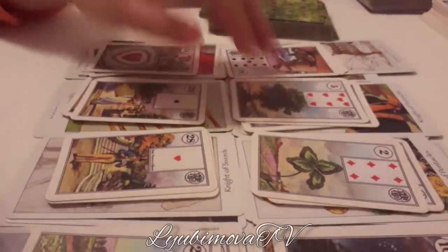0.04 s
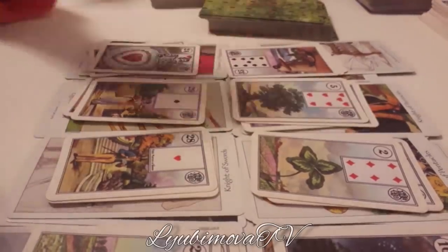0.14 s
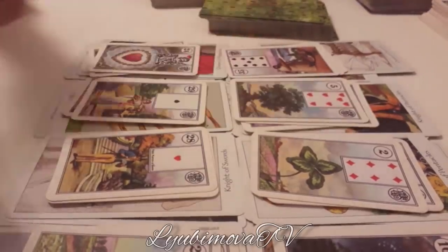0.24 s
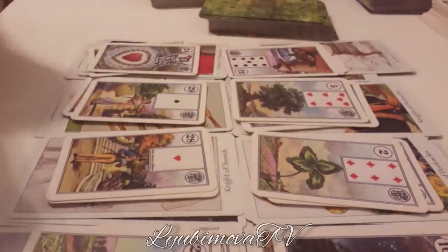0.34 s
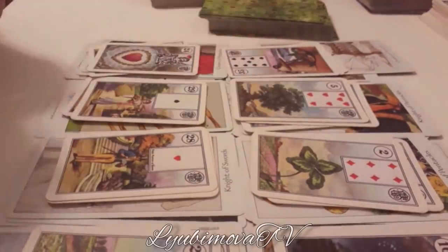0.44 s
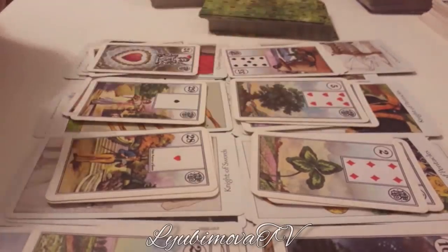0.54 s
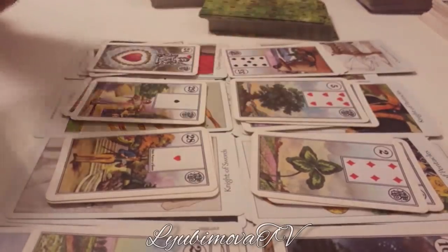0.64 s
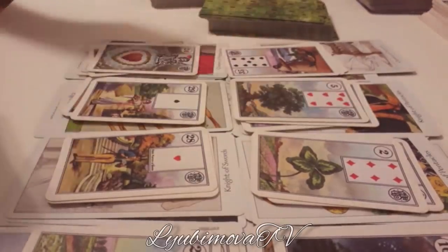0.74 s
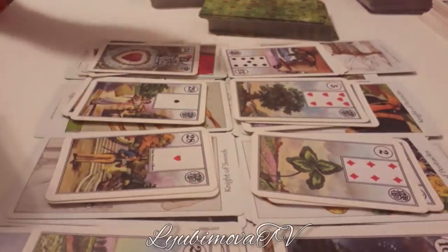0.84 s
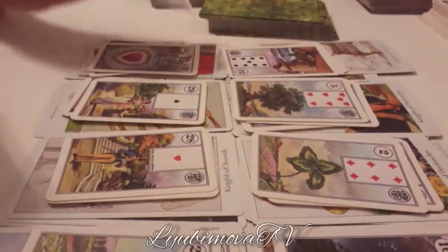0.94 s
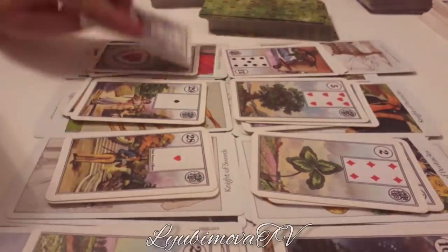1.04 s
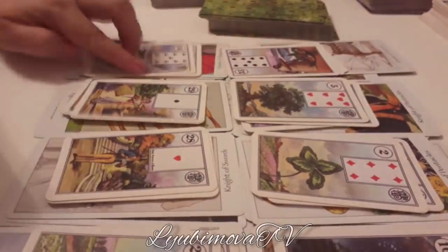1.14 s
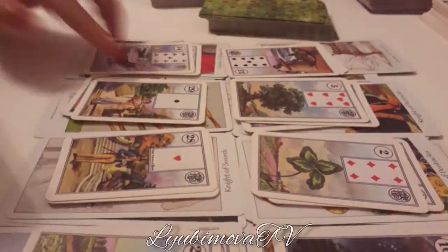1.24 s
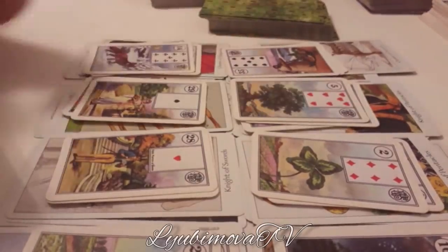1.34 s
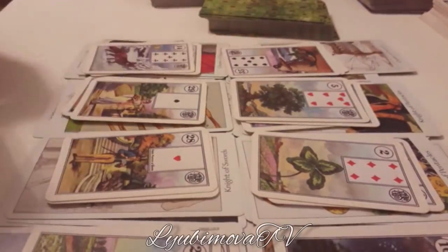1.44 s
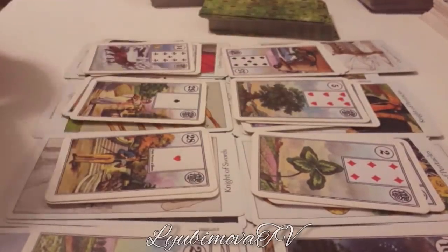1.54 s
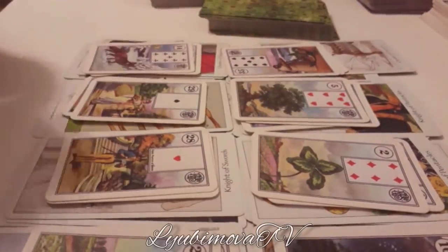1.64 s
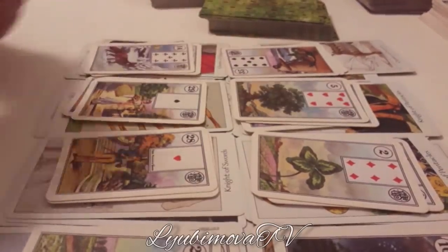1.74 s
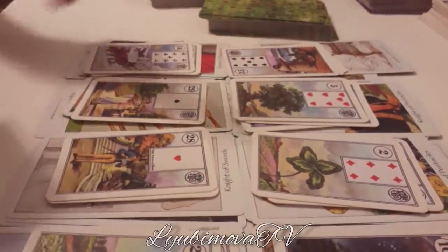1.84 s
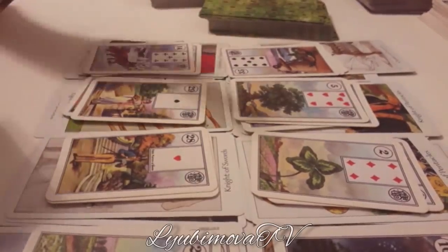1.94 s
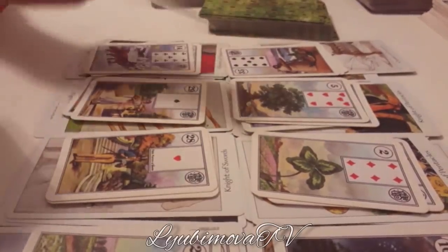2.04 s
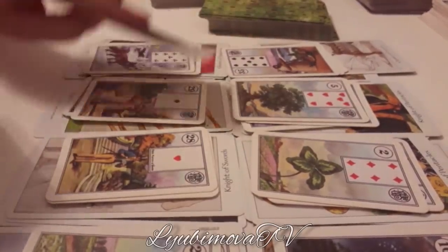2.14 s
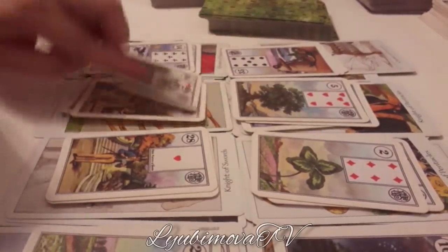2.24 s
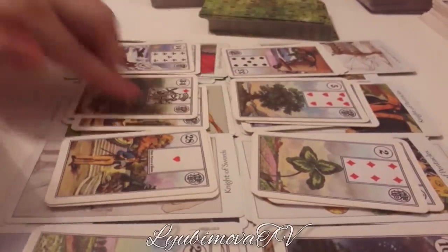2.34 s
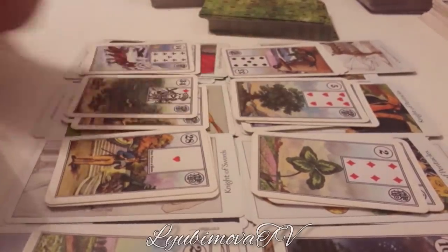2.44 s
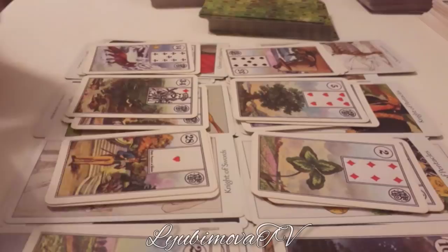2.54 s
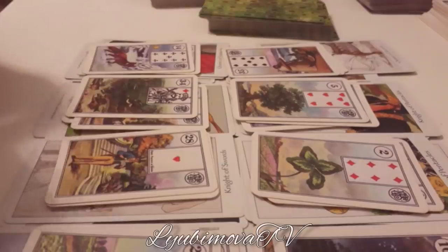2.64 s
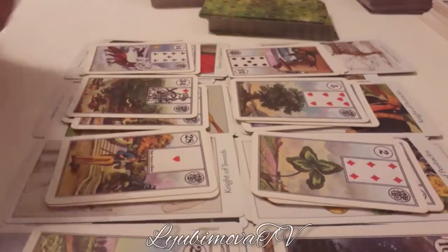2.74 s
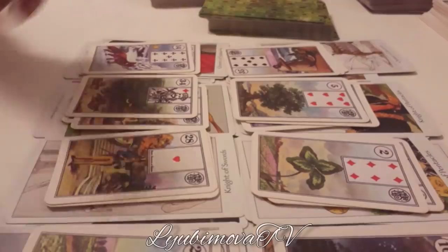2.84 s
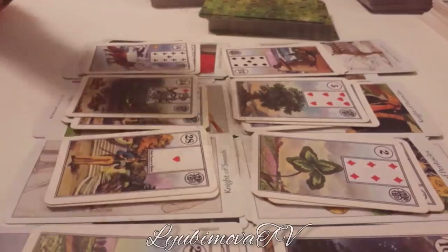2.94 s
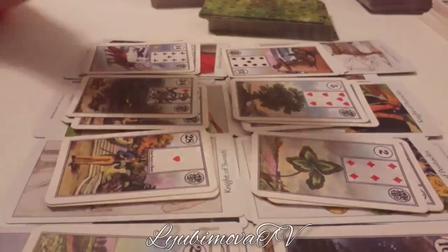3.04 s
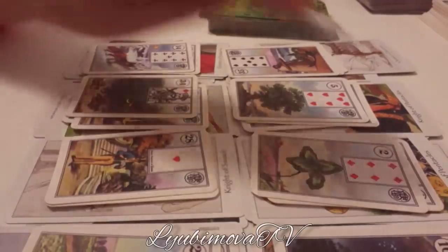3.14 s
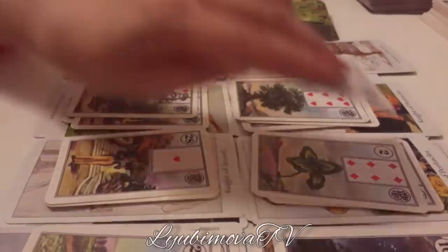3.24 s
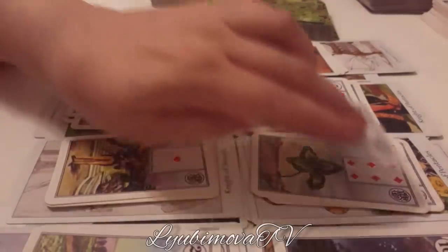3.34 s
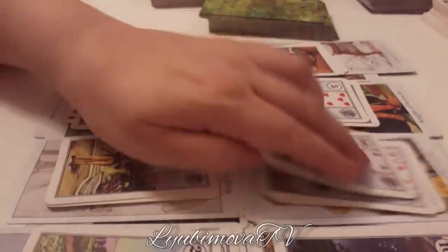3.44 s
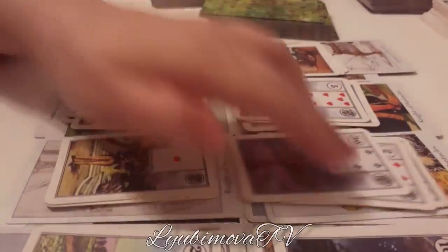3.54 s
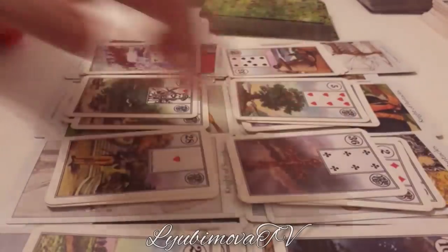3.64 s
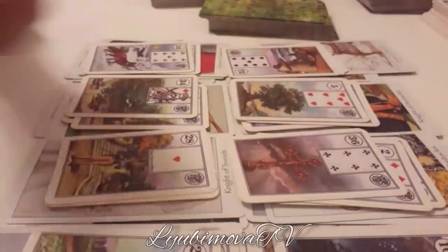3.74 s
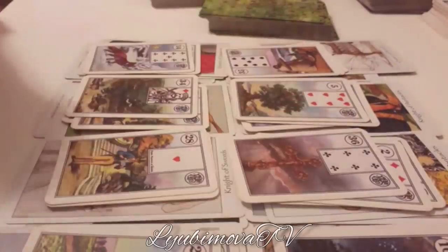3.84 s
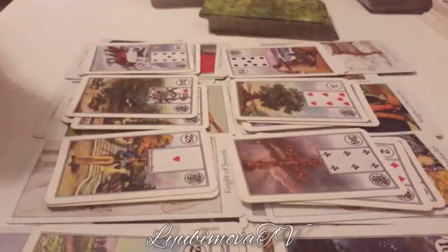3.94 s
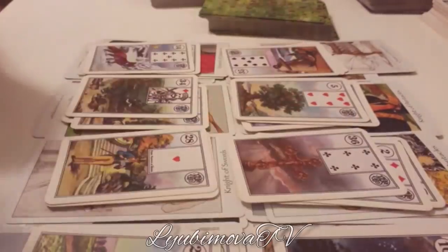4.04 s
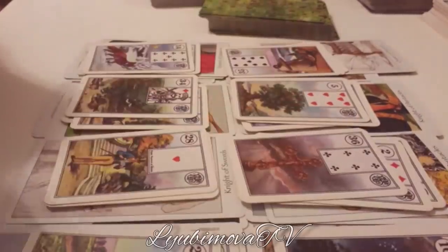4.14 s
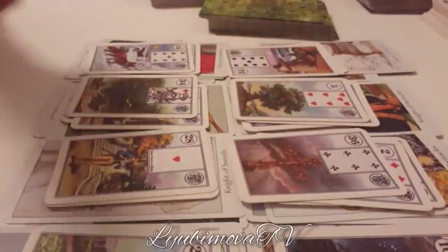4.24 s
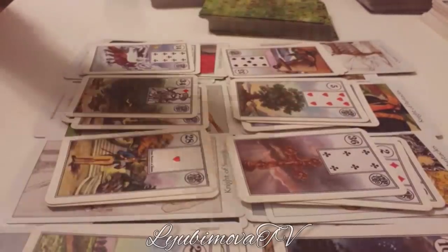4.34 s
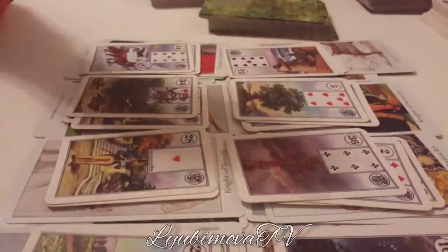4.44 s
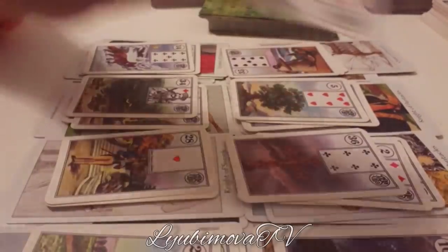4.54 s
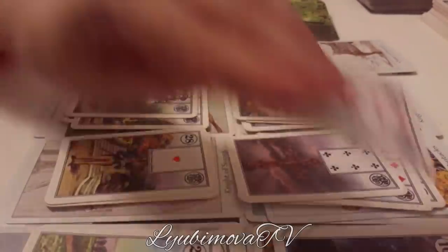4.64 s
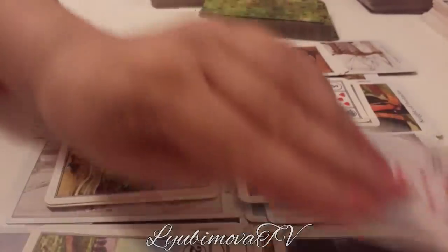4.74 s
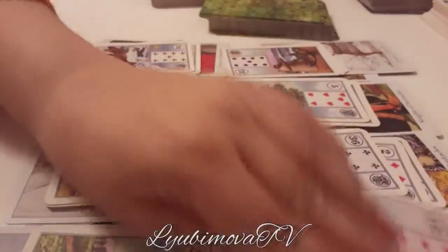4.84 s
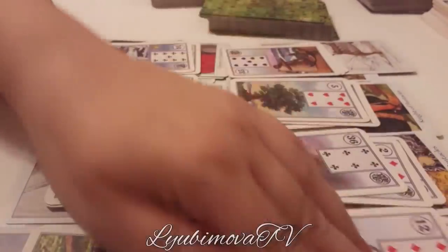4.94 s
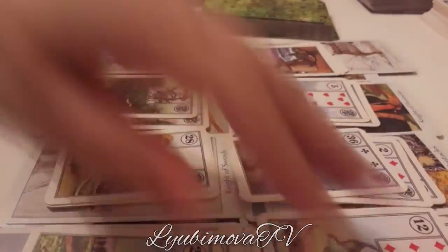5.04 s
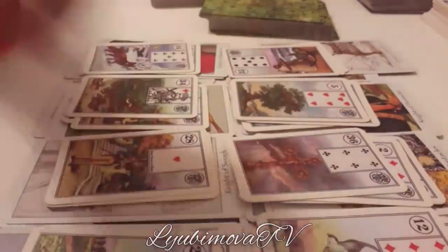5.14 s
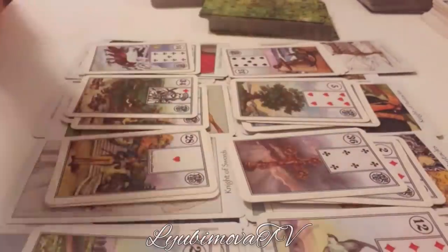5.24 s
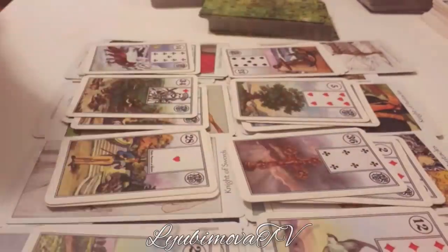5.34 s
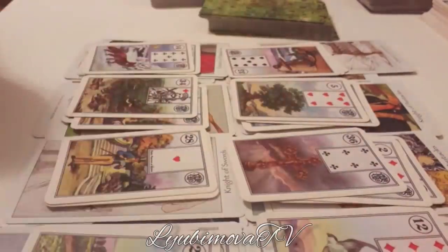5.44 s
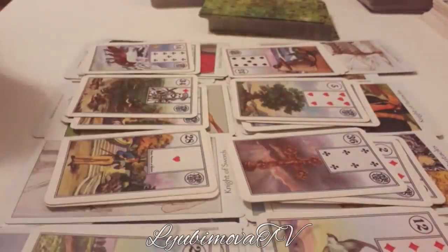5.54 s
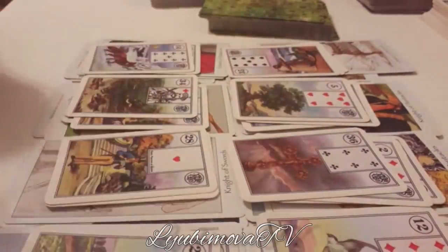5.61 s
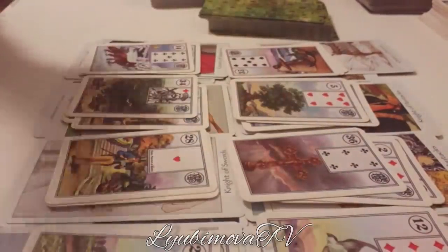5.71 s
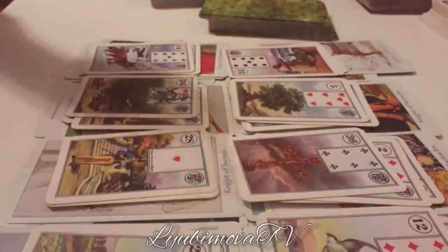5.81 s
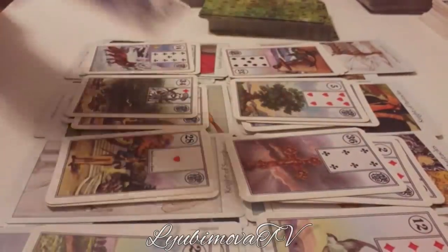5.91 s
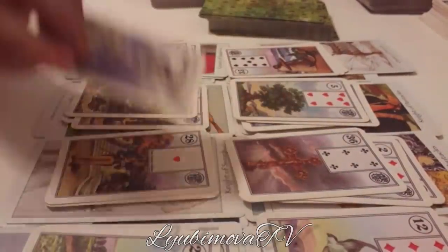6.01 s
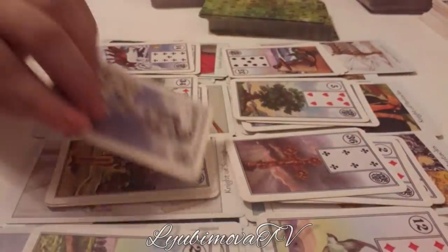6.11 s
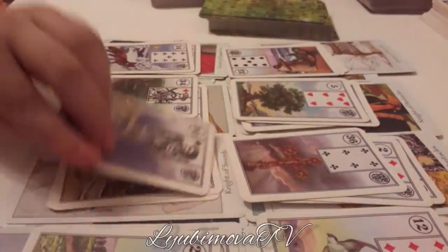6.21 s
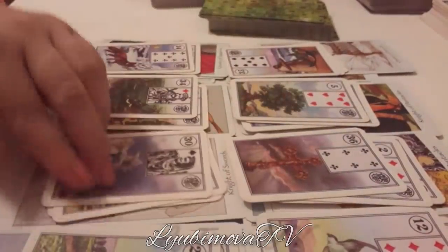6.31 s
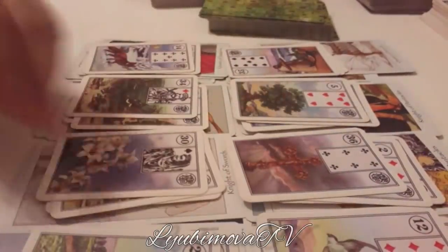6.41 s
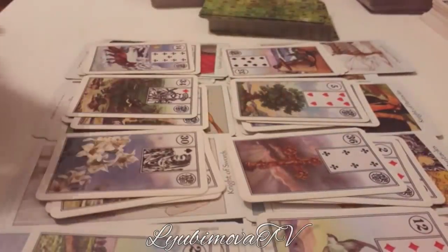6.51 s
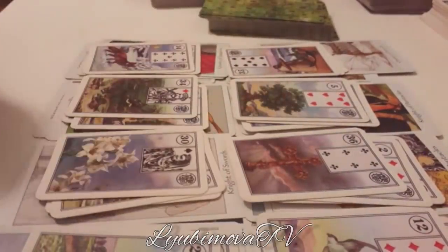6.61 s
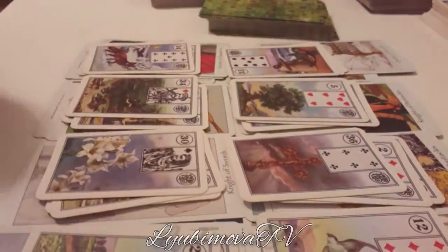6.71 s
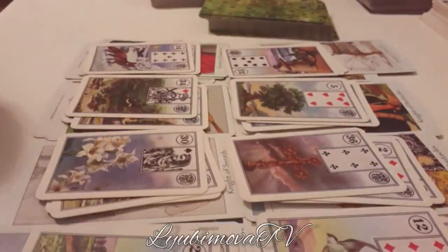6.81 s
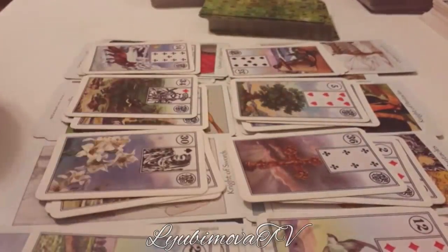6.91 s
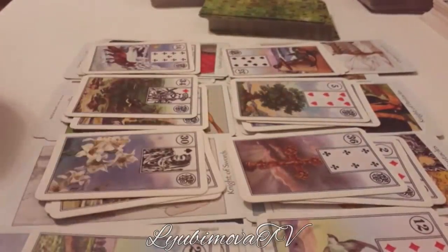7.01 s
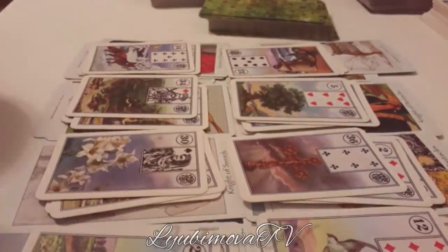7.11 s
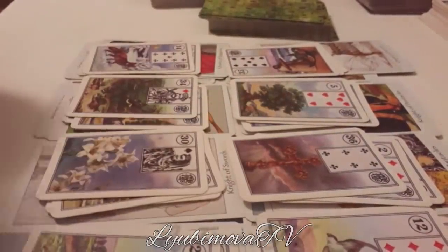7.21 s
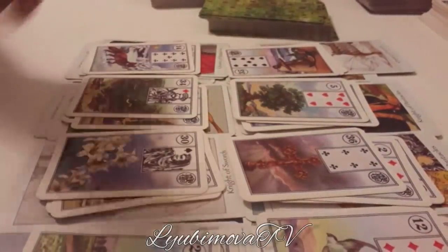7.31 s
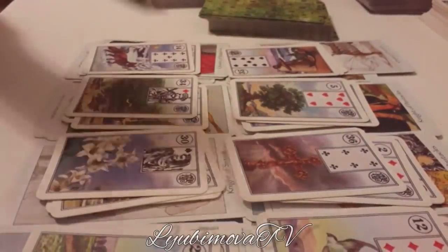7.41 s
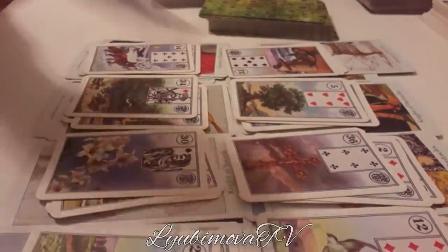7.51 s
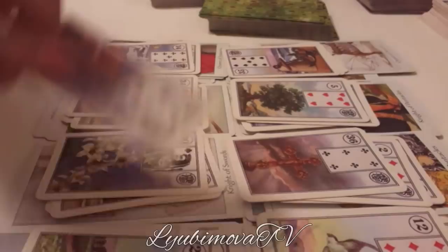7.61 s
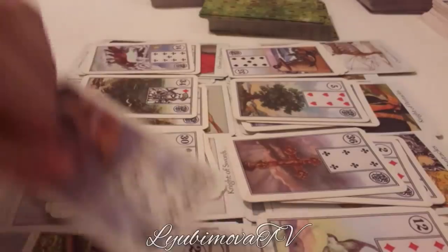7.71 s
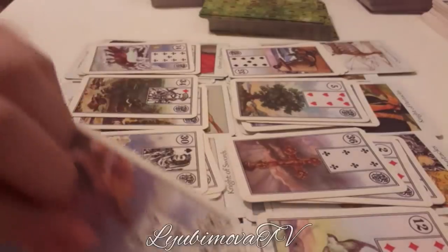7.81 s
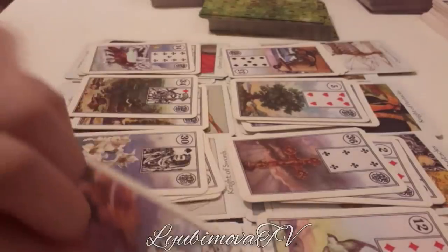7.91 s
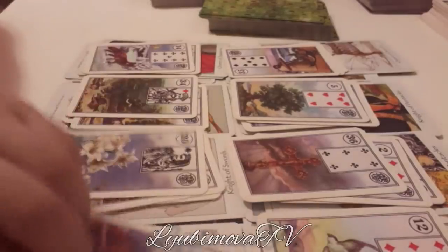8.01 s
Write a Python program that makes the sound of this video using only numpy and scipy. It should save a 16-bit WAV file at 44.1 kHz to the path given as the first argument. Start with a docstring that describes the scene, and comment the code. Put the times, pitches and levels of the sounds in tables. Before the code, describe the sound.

Unhurried card dealing: a crisp flick from the deck, a short pause, then a softer slap on a pile, repeated six times over faint hiss.

```python
"""Playing cards snap off a deck and slap down one by one on a cloth-covered table in a small, dry room.
Each release and touch is a burst of tiny slips driving stack modes, bent sheet and edge; slides are filtered noise.
Ticks, rubs and light drags fill the gaps, with a few soft table bumps.
Near surfaces and a brief room tail answer in nearly mono sound, over faint hiss and wavering mains hum."""
import sys
import numpy as np
from scipy import signal
from scipy.fft import rfft, irfft
from scipy.io import wavfile
from scipy.ndimage import map_coordinates

SR = 44100
rng = np.random.default_rng(int(sys.argv[2]) if len(sys.argv) > 2 else 0)


def transcribe(u):
    """Save the signal u as a 16-bit wav file named by the first command-line argument.

    u: samples, shape (n,) or (channels, n), limited to [-1, 1]; the rate is SR.
    q: integer samples, one column per channel.
    """
    v = np.clip(np.atleast_2d(u).T, -1, 1)
    q = np.round(v * 32767).astype(np.int16)
    wavfile.write(sys.argv[1], SR, q)


N = 355446
TIME = np.arange(N) / SR
STROKE_TIME = TIME[::20]  # coarse clock for slow hand movements, s
LEAD_S = .02  # slips begin this long before a release

# Cards pulled, slipping off the thumb and falling back on the deck; levels are relative.
# Each row: release in seconds, pull length in seconds, pull level in dB, contact in seconds, snap level in dB,
# snap brightness in dB, bend pitch in Hz, fall in seconds, landing level in dB, landing brightness in dB,
# thump level in dB, main deck pitch in Hz.
SNAPS = [(0.6785, 0.068, -49.5, 0.0044, -19, -6.5, 1213, 0.0063, -17, -11, -28, 192),
         (1.8115, 0.094, -44, 0.0045, -26, -3.5, 1130, .005, -27, -22, -31, 194),
         (2.8293, 0.072, -42, 0.0011, -32, 9, 1200, 0.003, -24.5, -3, -32.5, 177),
         (4.24, 0.098, -40.5, 0.00088, -17.5, -2.5, 965, .0025, -30, -15.5, -24.5, 194.6),
         (5.738, 0.1, -42.5, 0.01, -26, 5.5, 1280, .0104, -30.5, 1.5, -27.5, 210),
         (7.2436, 0.059, -38, 0.0029, -21.5, 7.5, 1160, 0.0049, -24.5, -13, -30, 233)]
# Cards laid on a pile, edge first and then flat; levels are relative.
# Each row: edge time in seconds, edge level in dB, edge brightness in dB, fall in seconds, flat level in dB,
# flat brightness in dB, thump against flex in dB, fizz against flex in dB, approach level in dB.
SLAPS = [(1.1764, -40, 12, 0.0056, -32, 2, -1, -3, -48.5),
         (2.321, -37, 10, .0074, -30.5, 1.5, -5, -7, -48.5),
         (3.488, -39, 4.5, 0.0083, -38, 1.5, -5, -5, -49),
         (4.9011, -45.5, 7.5, 0.0033, -35, -1.5, -7, 1.5, -52),
         (6.312, -45, 14, .0041, -29.5, -3.5, -7, -4.5, -46),
         (8.021, -38, 6, 0.0057, -39.5, 6, -5, -4, -53.5)]


def from_db(db):
    """Decibels to gain."""
    return 10 ** (np.asarray(db) / 20)


def rms_one(x):
    """Scale to rms 1."""
    return x / np.sqrt(np.mean(x ** 2) + 1e-20)


def blow(x):
    """Scale a short sound to the energy of 10 ms at rms 1."""
    return x / np.sqrt(np.sum(x ** 2) / (SR / 100) + 1e-20)


def at_hz(points, hz):
    """Read a table on a log-frequency axis."""
    f, value = np.transpose(points)
    return np.interp(np.log(hz), np.log(f), value)


def band(x, low_hz, high_hz, order=2):
    """Causal band-pass."""
    edges_hz = [low_hz, min(high_hz, .47 * SR)]
    return signal.sosfilt(signal.butter(order, edges_hz, "band", fs=SR, output="sos"), x + 1e-18)


def drift(knots_per_s):
    """Slow random line of rms 1."""
    knots = rng.standard_normal(N // 20)
    return rms_one(np.interp(TIME * knots_per_s, np.arange(len(knots)), knots))


def add(out, s, sound):
    """Mix a sound in at time s."""
    start = max(round(s * SR), 0)
    out[start:start + len(sound)] += sound[:N - start]


def snapping():
    """A card springs off the deck, rings at the pitch of its bend and lands a moment later at a lower pitch."""
    release_thump_db, landing_thump_db = -3, 1.5  # against the snap's thump
    release_fizz_db, landing_fizz_db = -7, -11  # against the flex
    landing_s, landing_pitch = .003, .87  # pitch of the relaxed card against the bent one
    out = np.zeros(N)
    for (s, _, _, contact_s, db, bright_db, bend_hz, fall_s,
         land_db, land_bright_db, thump_db, deck_hz) in SNAPS:
        release = [thump_db + release_thump_db, *sheet_levels(db, bright_db, release_fizz_db)]
        landing = [thump_db + landing_thump_db, *sheet_levels(land_db, land_bright_db, landing_fizz_db)]
        hits = ((s, contact_s, release, bend_hz),
                (s + fall_s, landing_s, landing, bend_hz * landing_pitch))
        for hit_s, length_s, levels_db, flex_hz in hits:
            sound = contact(length_s, levels_db, flex_hz, flex_ratio=1.426, deck_hz=deck_hz,
                            click=.43, push_s=.00055, crack_hz=(2300, 5000), fizz_hz=8300)
            add(out, hit_s - LEAD_S, sound)
    return out


def laying(edge_s, flat_s):
    """The edge scrapes in, then the face falls flat."""
    edge_thump_db = -3.5  # an edge moves the pile less than the face does
    out = np.zeros(N)
    for s, edge_db, edge_bright_db, fall_s, flat_db, flat_bright_db, thump_db, fizz_db, _ in SLAPS:
        edge = tap(edge_s, edge_db, edge_bright_db, thump_db + edge_thump_db, fizz_db)
        add(out, s - LEAD_S, edge)
        face = tap(flat_s, flat_db, flat_bright_db, thump_db, fizz_db)
        add(out, s + fall_s - LEAD_S, face)
    return out


def ticking():
    """Card edges and fingertips touch deck and piles; the shorter the touch, the more the edge fizzes."""
    # Each row: time in seconds, contact in seconds, relative level in dB, brightness in dB.
    ticks = [(.031, 0.00078, -71, 2), (.145, 0.0025, -70.5, 16), (0.37, 0.0042, -54, 3),
             (0.9328, 0.015, -48.5, 8), (1.008, 0.0072, -51.5, -11), (1.0307, 0.0077, -51.5, 0),
             (1.0566, 0.013, -52.5, 5), (1.11, 0.0058, -51, 6.5), (1.1391, 0.007, -60.5, 15),
             (1.438, 0.01, -60.5, 5.5), (1.479, 0.0014, -59, 3), (2.251, 0.0016, -48.5, -2),
             (2.2823, 0.0051, -44.5, 3.5), (2.6435, 0.0056, -48.5, -2), (2.6567, .002, -45.5, 1),
             (2.7678, 0.0037, -54, 15), (2.8652, 0.0024, -36.5, 2), (3.054, 0.0031, -50, 3),
             (3.438, 0.0062, -40.5, -5), (3.4532, .012, -50.5, 0.5), (4.2508, .002, -30.5, -5),
             (4.8449, 0.0051, -49, -1), (5.3649, 0.0044, -58.5, 0.5), (5.407, 0.0018, -62, 2.5),
             (5.6571, .004, -54, 0.5), (6.203, 0.0051, -54.5, -10), (6.6757, 0.0031, -46, 7.5),
             (6.752, 0.0019, -47, 5), (6.863, 0.0023, -61.5, 10), (7.222, .0015, -47.5, 9.5),
             (7.475, 0.0026, -56, 18), (7.544, 0.0032, -48.5, -4), (7.552, 0.0058, -59, 16),
             (7.9051, 0.003, -52, 0)]
    usual_s, usual_fizz_db, fizz_db_per_halving = .003, -8, 1
    out = np.zeros(N)
    for s, contact_s, db, bright_db in ticks:
        fizz_db = usual_fizz_db + fizz_db_per_halving * np.log2(usual_s / contact_s)
        add(out, s - LEAD_S, tap(contact_s, db, bright_db, thump_db=-6.5, fizz_db=fizz_db))
    return out


def tap(contact_s, db, bright_db, thump_db, fizz_db):
    """The pile damps the card to a broad slap; thump and fizz are set against the flex."""
    levels_db = [db + thump_db, *sheet_levels(db, bright_db, fizz_db)]
    return contact(contact_s, levels_db, flex_hz=1050, flex_ratio=1.81, deck_hz=191,
                   click=.5, push_s=.000061, crack_hz=(2100, 5600), fizz_hz=11300)


def sheet_levels(db, bright_db, fizz_db):
    """Levels of flex, crack and edge fizz: a harder contact is brighter."""
    fizz_follows = .7  # share of the brightness that reaches the fizz
    return db, db + bright_db, db + fizz_db + fizz_follows * bright_db


def contact(length_s, levels_db, flex_hz, flex_ratio, deck_hz, click, push_s, crack_hz, fizz_hz):
    """Tiny slips swell to a sharp release at LEAD_S, driving the stack, the bent sheet and its edge."""
    # Modes of a stack of cards. Each row: multiple of its main pitch, relative level in dB, T60 in seconds.
    deck_modes = [(.7, -3.5, 0.038), (1, 2.5, 0.03), (1.551, -0.5, 0.028), (2.099, -5, 0.058),
                  (3.1, 0, 0.016)]
    rise_share = .27  # swell time constant as a share of the contact
    t = TIME[:SR // 10] - LEAD_S
    after = np.maximum(t, 0)
    length_s = max(length_s, 3e-4)
    pressure = np.exp(np.minimum(t, 0) / (rise_share * length_s) - 2.1 * (after / length_s) ** 2)
    # a light brush for a few milliseconds on either side
    pressure = pressure + from_db(-20) * np.exp(-np.abs(t) / .0053)
    slips = blow(rng.standard_normal(len(t)) * pressure)

    impulse = blow(np.diff(t >= 0, prepend=False) * 1.0)
    # a long brush has hardly any release
    release = impulse * np.exp(-length_s / .0036) * rng.choice([-1, 1])
    sheet = card(slips + click * release)

    # each grip shifts the stack's modes a little
    grip = rng.standard_normal((len(deck_modes), 2))
    deck = np.zeros(len(t))
    for k, ((ratio, db, t60_s), (level_shift, pitch_shift)) in enumerate(zip(deck_modes, grip)):
        mode_hz = deck_hz * ratio * (1 + .077 * pitch_shift)
        decay = from_db(db + 2 * level_shift - 60 * after / t60_s)
        deck += (-1) ** k * decay * np.sin(2 * np.pi * mode_hz * after)

    thump = band(deck * (1 - np.exp(-after / push_s)), 68, 540)
    flex = band(sheet, flex_hz / flex_ratio, flex_hz * flex_ratio)
    crack = band(sheet, *crack_hz, order=3)
    fizz = band(band(sheet, 6100, SR, order=3), 2300, fizz_hz, order=1)
    return sum(from_db(db - .23) * blow(part) for db, part in zip(levels_db, (thump, flex, crack, fizz)))


def card(x):
    """The stiff card's bending modes reshape their own frequencies and ring on a little."""
    # Resonances and dips, applied in turn. Each row: frequency in Hz, width in Hz, gain in dB.
    card_modes = [(549, 23, -9.5), (637, 51, 3), (800, 190, 7.5), (1034, 140, 7), (1179, 88, 1),
                  (1340, 340, 7), (1976, 360, 7.5), (2747, 400, 6), (3486, 260, 5.5), (4193, 280, 6.5)]
    for hz, width_hz, gain_db in card_modes:
        mode = signal.lfilter(*signal.iirpeak(hz, hz / width_hz, fs=SR), x)
        x = x + (from_db(gain_db) - 1) * mode
    return x


def sliding(flutter_db, flutter_rate, judder_db):
    """Friction sounds through the card; as the contact line travels, patches of the spectrum come and go."""
    body_gain, rasp_gain, hiss_gain = friction_levels()
    white, edges_hz = rng.standard_normal((2, N)), np.geomspace(150, 19000, 25)
    patches = np.zeros(N)
    for k, (low_hz, high_hz) in enumerate(zip(edges_hz, edges_hz[1:])):
        # the sheet's modes flutter most; the fine hiss of the fibres stays smoother
        depth_db = flutter_db * min(1, 3000 / low_hz)
        patches += band(white[k % 2], low_hz, high_hz) * from_db(depth_db * drift(flutter_rate))

    # paper fibres catch about 450 times a second
    catches = band((rng.random(N) < 450 / SR) * rng.standard_normal(N), 700, 5000, order=1)
    friction = card(rms_one(patches) + from_db(-6.5) * rms_one(catches))
    friction = friction * from_db(judder_db * drift(70))

    upper_body = from_db(2) * rms_one(band(friction, 670, 1500))
    lower_body = from_db(-3) * rms_one(band(friction, 190, 540))
    rasp = from_db(2) * rms_one(band(friction, 2900, 7000))
    treble = band(friction, 5100, SR, order=3)
    hiss = from_db(.04) * rms_one(band(treble, 1500, 7700, order=1))
    return body_gain * (upper_body + lower_body) + rasp_gain * rasp + hiss_gain * hiss


def friction_levels():
    """Gains of body, rasp and hiss: strokes add in power; brighter ones trade body for hiss."""
    body_db, hiss_db = -7.5, .5  # against the rasp
    power = 0
    for envelope, db, bright_db in strokes():
        levels_db = [[db + body_db - bright_db], [db], [db + hiss_db + bright_db]]
        power = power + from_db(levels_db) ** 2 * envelope ** 2
    return [np.interp(TIME, STROKE_TIME, np.sqrt(p)) for p in power]


def strokes():
    """Every sliding movement as (envelope, relative dB, brightness dB)."""
    # Short strokes of thumb or card over card.
    # Each row: peak time in seconds, half length in seconds, level in dB, brightness in dB.
    rubs = [(0.003, 0.02, -57.5, 0.5), (0.521, 0.03, -57, 3), (0.608, 0.02, -52.5, 2.5),
            (0.731, 0.042, -44.5, -2.5), (1.126, 0.027, -53, -8), (1.636, 0.032, -56, 3.5),
            (1.98, 0.016, -53, -1.5), (2.094, 0.051, -61, -10), (2.292, 0.016, -56.5, -11),
            (2.747, 0.022, -52.5, 1), (2.951, 0.018, -50, 2.5), (3.11, 0.035, -47.5, -6),
            (3.173, 0.01, -47.5, -7), (4.069, 0.018, -55.5, 6), (4.093, 0.014, -49.5, 1.5),
            (4.36, 0.019, -47.5, -2.5), (4.49, .015, -65.5, 9.5), (5.566, 0.0087, -53.5, 1.5),
            (5.86, .018, -50.5, 2), (5.982, 0.022, -66.5, 9), (6.107, 0.013, -55.5, -6),
            (6.265, 0.016, -51, -7), (6.917, .012, -59.5, 2.5), (7.034, 0.021, -49.5, 0.5),
            (7.12, 0.017, -55.5, 0.5), (7.17, 0.011, -50.5, 0), (7.32, 0.036, -46.5, -2),
            (7.488, 0.007, -34.5, -2)]
    # Long light friction as a card is carried or fingers shift on the deck.
    # Each row: start in seconds, end in seconds, level in dB, fall (+) or rise (-) in dB/s, brightness in dB.
    drags = [(0, .5, -66.5, -1.5, 1), (0.847, 1.159, -57.5, 2.5, -4.5), (1.486, 1.727, -60, 0, 2),
             (1.834, 2.194, -58, 31, -0.5), (2.602, 2.751, -66.5, 14, 3), (2.92, 3.44, -54, 19, -4),
             (3.689, 4.02, -65, 7, -0.5), (4.385, 4.799, -58, 18, -3), (5.28, 5.6, -69.5, -3.5, 1.5),
             (5.895, 6.247, -62.5, 17, -5), (6.495, 6.995, -70, 2.5, -1.5), (7.375, 7.9, -57, 29, -7.5)]
    rub_steepness, drag_ramp_s = 2.2, .057
    for s, pull_s, pull_db, *_ in SNAPS:
        yield swell(s, pull_s, db_per_s=112.5), pull_db, 1.5
    for s, *_, approach_db in SLAPS:  # the card skims the pile just before
        yield swell(s, length_s=.05, db_per_s=156), approach_db, -4
    for s, half_s, db, bright_db in rubs:
        yield (1 + ((STROKE_TIME - s) / (2 * half_s)) ** 2) ** -rub_steepness, db, bright_db
    for start_s, end_s, db, fall_db_per_s, bright_db in drags:
        from_edge_s = np.minimum(STROKE_TIME - start_s, end_s - STROKE_TIME)
        held = np.clip(from_edge_s / drag_ramp_s + .5, 0, 1)
        yield held * from_db(-fall_db_per_s * np.clip(STROKE_TIME - start_s, 0, 1)), db, bright_db


def swell(end_s, length_s, db_per_s):
    """Friction sets in, grows steadily and stops abruptly at end_s."""
    left_s = end_s - STROKE_TIME
    onset = np.clip((length_s - left_s) / .026, 0, 1)
    return from_db(-db_per_s * np.clip(left_s, 0, 1)) * onset * (left_s > 0)


def bumps(hz, t60_s):
    """The arm bumps the table softly; its top gives a low, padded knock, a decaying sine."""
    # Each row: time in seconds, relative level in dB.
    bump_rows = [(0.216, -55.5), (0.299, -57.5), (6.613, -56), (7.18, -58)]
    out, t = np.zeros(N), TIME[:SR // 4]
    for s, db in bump_rows:
        knock = from_db(db - 60 * t / t60_s) * np.sin(2 * np.pi * hz * t)
        add(out, s, knock * (1 - np.exp(-t / .006)))
    return out


def echoes(x):
    """Table, hands and other near surfaces send back a few slightly dulled copies."""
    # Each row: delay in seconds, gain in dB.
    reflections = [(.0013, -16.5), (.0031, -22.5), (.0058, -30), (.0094, -16), (0.0138, -18)]
    out, dull = x.copy(), band(x, 300, 12000, order=1)
    for delay_s, db in reflections:
        add(out, delay_s, from_db(db) * dull)
    return out


def room(x, build_s):
    """The walls add a diffuse noise tail that builds up and dies band by band."""
    # Room decay, held within 0.1-0.7 s below. Each row: frequency in Hz, T60 in seconds.
    t60_points = [(120, 0.64), (300, 0.33), (650, .29), (1100, 0.31), (3000, 0.3), (7000, 0.31),
                  (14000, 0.072)]
    # Tail against its input. Each row: frequency in Hz, level in dB.
    level_points = [(120, -14.5), (350, -5.5), (680, -7), (1100, -11), (1900, -9.5), (4300, -12),
                    (8000, -7.5), (14000, -10.5)]
    t, edges_hz = TIME[:SR * 3 // 5], np.geomspace(80, 19000, 25)
    white, response = rng.standard_normal((2, len(t))), 0
    for k, (low_hz, high_hz) in enumerate(zip(edges_hz, edges_hz[1:])):
        hz = np.sqrt(low_hz * high_hz)
        t60_s = np.clip(at_hz(t60_points, hz), .1, .7)
        shape = from_db(-60 * t / t60_s) * (1 - np.exp(-t / build_s))
        tail = band(white[k % 2], low_hz, high_hz) * shape
        # energy in proportion to bandwidth
        even_gain = np.sqrt(2 * (high_hz - low_hz) / SR / np.sum(tail ** 2))
        response = response + tail * even_gain * from_db(at_hz(level_points, hz))
    # wavering echo paths keep the treble of the tail smooth and unpitched
    waver_s = 1.2e-4 * drift(220)
    wet = signal.fftconvolve(x, response)[:N]
    return map_coordinates(wet, [(TIME + waver_s) * SR], order=3)


def widen(x):
    """Nearly mono sound, with a slight width in the treble."""
    # Greatest side level against the middle, before a comb. Each row: frequency in Hz, level in dB.
    side_points = [(4600, -65), (5200, -34), (6100, -28), (8200, -31.5), (10700, -14), (12400, -26),
                   (15200, -3.5)]
    hz = np.maximum(np.fft.rfftfreq(N, 1 / SR), 1)
    comb = 1j * np.sin(2 * np.pi * hz * .0011)
    side = irfft(rfft(x) * comb * from_db(at_hz(side_points, hz)), N)
    return np.array([x + side, x - side])


def background():
    """Steady shaped noise for room and hiss, and sines wavering in level and phase for the hum."""
    # Noise spectrum, only its shape counts. Each row: frequency in Hz, relative density in dB per Hz.
    floor_points = [(20, -10), (45, -1), (90, -1), (150, -3), (260, -9), (700, -16), (2000, -20),
                    (4200, -13), (9000, -15), (15500, -19)]
    # Mains hum. Each row: frequency in Hz, middle rms level in dB.
    hum_rows = [(48.6, -70.5), (146, -79)]
    floor_db = -66  # rms
    hz = np.maximum(np.fft.rfftfreq(N, 1 / SR), 1)
    noise = rms_one(irfft(rfft(rng.standard_normal(N)) * from_db(at_hz(floor_points, hz)), N))
    hum = np.zeros(N)
    for hum_hz, db in hum_rows:
        level = from_db(db + 2.5 * drift(6)) * np.sqrt(2)
        hum += level * np.sin(2 * np.pi * hum_hz * TIME + .5 * drift(4))
    return from_db(floor_db) * noise + hum


def scene():
    """Snaps, taps and slides share one table and one room."""
    snaps = snapping()
    taps = laying(edge_s=.0047, flat_s=.002) + ticking()
    slides = sliding(flutter_db=3.6, flutter_rate=65, judder_db=1.9)
    direct = echoes(snaps + taps + slides)
    room_send = from_db(-1.5) * snaps + from_db(2.5) * taps + from_db(2) * slides
    tail = room(room_send, build_s=.0028)
    return widen(direct + tail + bumps(hz=91.5, t60_s=.57) + background())


def record(dry):
    """The highest peaks are rounded and the top is cut steeply."""
    cutoff_hz = 16000
    rounded = 1.1 * np.tanh(dry / 1.1)
    return signal.sosfilt(signal.ellip(10, .1, 70, cutoff_hz, fs=SR, output="sos"), rounded)


dry = scene()
out = record(dry)
transcribe(out)
```